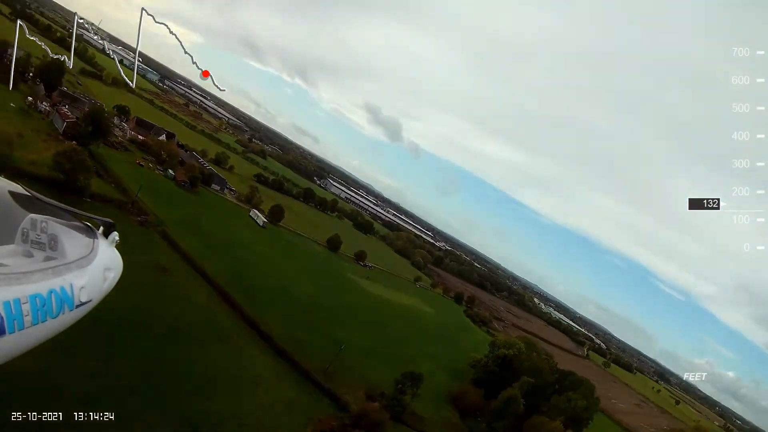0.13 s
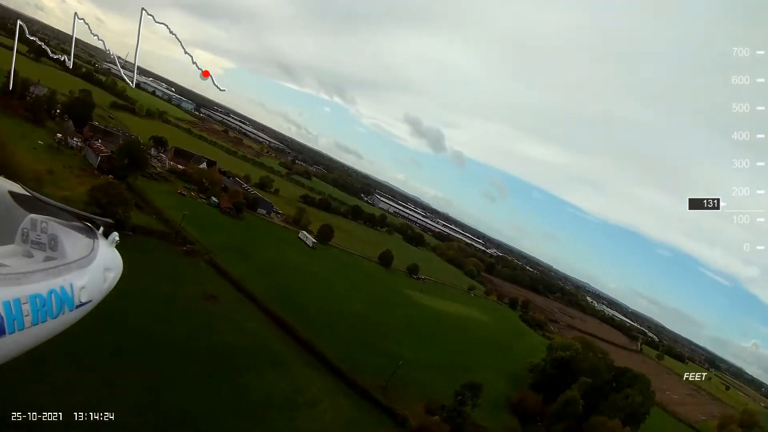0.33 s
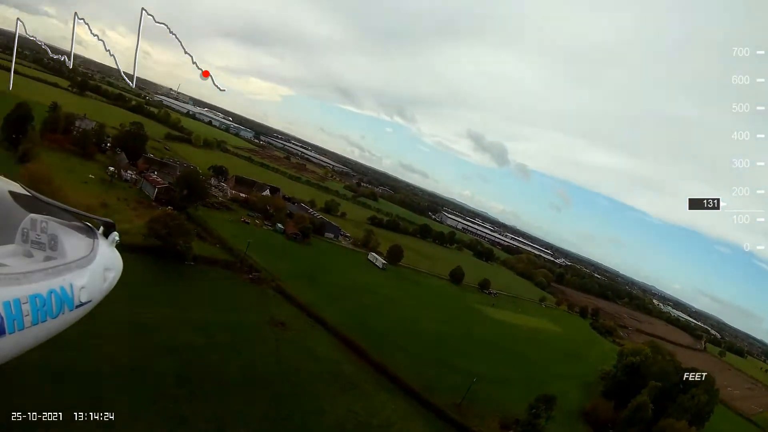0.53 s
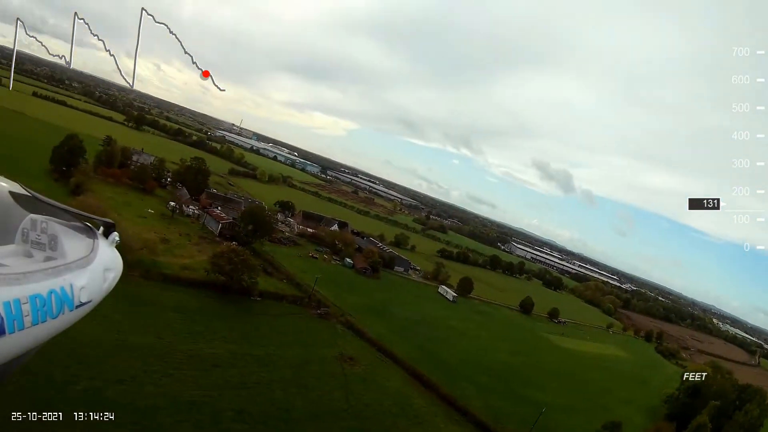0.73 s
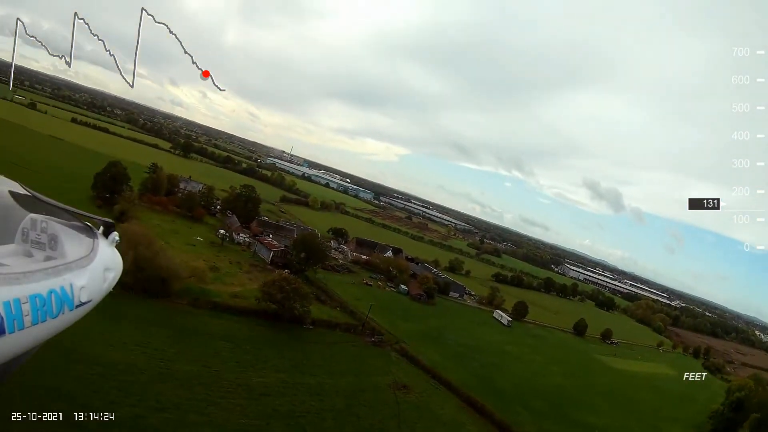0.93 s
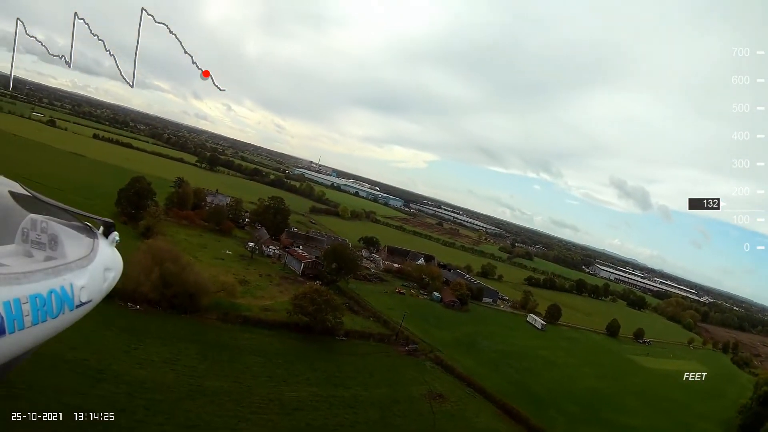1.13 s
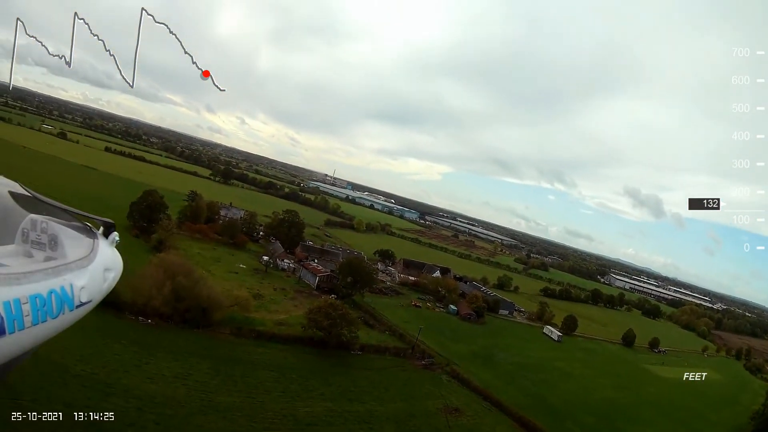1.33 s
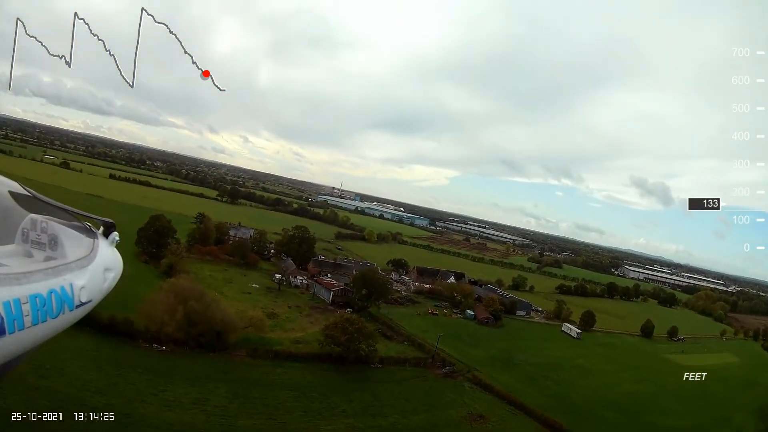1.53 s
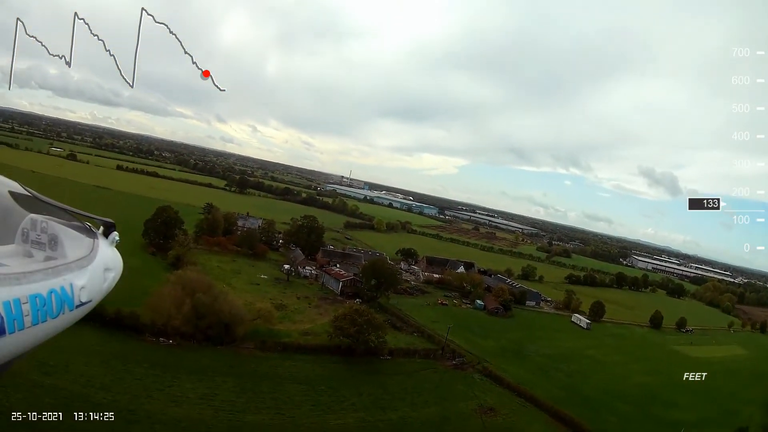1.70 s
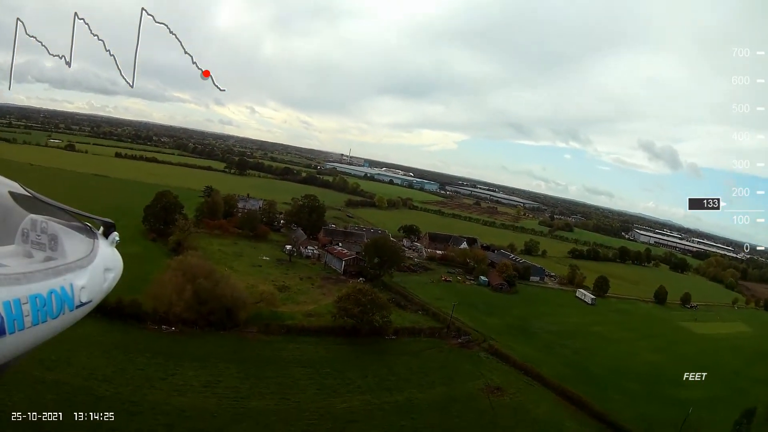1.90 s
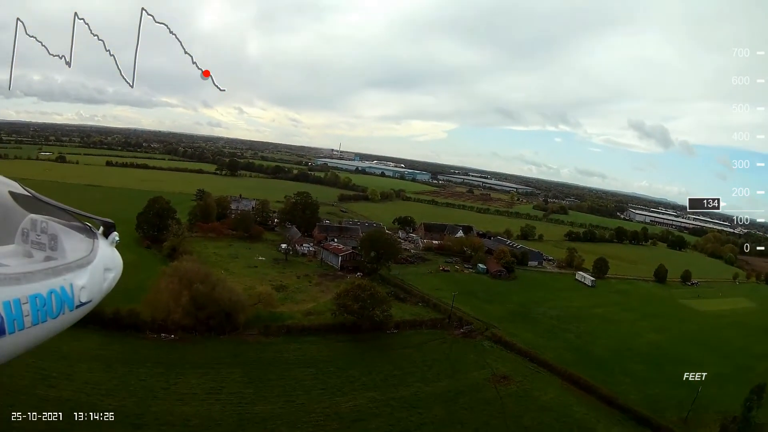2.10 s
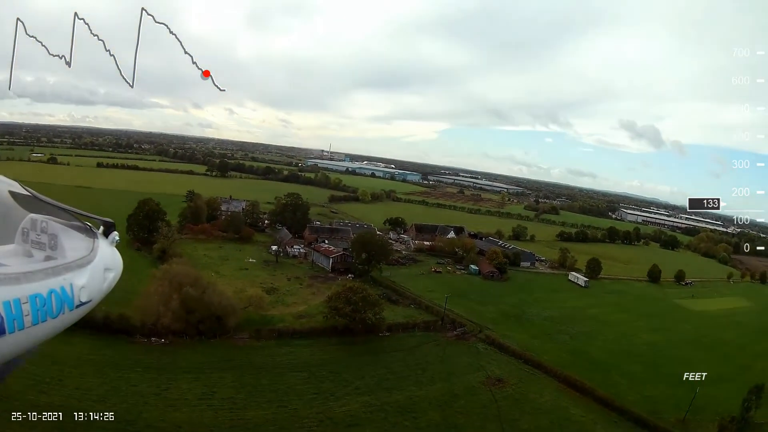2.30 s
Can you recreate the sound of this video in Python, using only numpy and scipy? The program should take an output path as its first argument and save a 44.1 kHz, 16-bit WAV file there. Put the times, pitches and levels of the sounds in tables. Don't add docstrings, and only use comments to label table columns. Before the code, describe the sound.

Wind roars across a small onboard microphone in gliding flight, breathy and centred near 2.5 to 3 kHz. It flutters with tiny whistles until 0.4 s, swells at 0.55-0.7, and sinks to a lull from 0.8 to 1.2. A sharp gust peaks at 1.4, then quiet until 1.85 exposes faint servo ticking, fifty per second. Strong uneven roaring fills the end, dry, limited, with slight watery compression artefacts.

```python
import sys
import numpy as np
from scipy import signal
from scipy.fft import rfft, irfft, next_fast_len
from scipy.io import wavfile
from scipy.ndimage import uniform_filter1d, minimum_filter1d

SR = 44100
rng = np.random.default_rng(int(sys.argv[2]) if len(sys.argv) > 2 else 0)


def bounce(signal):
    frames = np.transpose(np.atleast_2d(signal))
    limited = np.clip(frames, -1, 1)
    pcm = np.round(limited * 32767).astype(np.int16)
    wavfile.write(sys.argv[1], SR, pcm)


def nominal_scale(level):
    x = np.asarray(level, float) / 20
    return 10 ** x


N = 103811


def evened(x):
    return x / np.sqrt(np.mean(x ** 2) + 1e-20)


def read(points, hz):
    f, value = np.transpose(points)
    return np.interp(np.log(hz + 1), np.log(f + 1), value)


def bump(t, centre, length):
    return np.cos(np.pi / 2 * np.clip((t - centre) / length, -1, 1)) ** 2


def servo():
    # pitch_hz, level_db, t60_s
    shell_modes = [(2750, 0, .011), (3400, -2, .008), (2300, -5, .008), (1400, -8, .01), (5300, -27, .008),
                   (12000, -44, .005)]
    start_s, period_s, level_db, spread_db = .0122, .02, -29, 2.5
    at = np.round((start_s + period_s * np.arange(117)) * SR).astype(int)
    kicks = np.zeros(N)
    kicks[np.clip(at, 0, N - 1)] = nominal_scale(spread_db * rng.standard_normal(len(at)))
    kicks = signal.oaconvolve(kicks, np.hanning(70))[:N] * rng.standard_normal(N) * .3
    t = np.arange(900) / SR
    ring = sum(nominal_scale(db - 60 * t / t60) * np.sin(2 * np.pi * hz * t) for hz, db, t60 in shell_modes)
    ring = ring * (1 - np.exp(-t / .0005)) ** 2
    return nominal_scale(level_db) * signal.oaconvolve(kicks, ring)[:N]


def whistles():
    # centre_s, length_s, pitch_hz, level_db
    edge_tones = [(.006, 0.012, 4000, -39), (0.036, 0.015, 5100, -32), (0.044, 0.01, 3450, -19.5),
                  (.057, 0.011, 4650, -36.5), (.073, 0.011, 3050, -17.5), (0.076, 0.023, 5700, -31),
                  (.092, 0.013, 3050, -27), (0.115, 0.012, 2950, -21), (.164, .012, 3700, -29),
                  (.172, 0.021, 4750, -28), (0.217, 0.0068, 3150, -14.5), (.228, 0.013, 3150, -20),
                  (0.247, 0.016, 3400, -20.5), (0.336, 0.028, 4150, -23.5), (0.416, .04, 6250, -39),
                  (.49, 0.014, 3300, -24.5), (0.517, 0.033, 6000, -34), (0.139, 0.017, 652, -28.5),
                  (0.175, 0.011, 960, -24.5), (.268, 0.013, 4700, -33), (0.148, .014, 5200, -34),
                  (.366, 0.026, 2930, -31), (1.932, 0.018, 992, -23), (0.572, 0.033, 5700, -37),
                  (0.694, 0.016, 1700, -15.5), (1.385, 0.035, 2900, -19), (1.975, 0.034, 2850, -18),
                  (2.126, 0.072, 2600, -23), (2.284, 0.03, 1700, -21), (2.33, 0.034, 2234, -19.5)]
    width_hz = 190
    out = np.zeros(N + 4000)
    r = np.exp(-np.pi * width_hz / SR)
    a, b = rng.standard_normal((2, N + 4000))
    wobble = signal.lfilter([1], np.convolve([1, -r], [1, -r]), a + 1j * b)
    wobble = 0.78 + 0.63 * wobble / abs(wobble).mean()
    for s, length, hz, db in edge_tones:
        at = np.arange(max(round((s - length) * SR), 0), round((s + length) * SR))
        t = at / SR - s
        turns = hz * (t - 0.016 * t ** 2 / length)
        tone = (wobble[at] * np.exp(2j * np.pi * turns)).real
        out[at] += nominal_scale(db) * bump(t, 0, length) * tone
    return out[:N]


def wind(patchy_db=2.5, flicker_db=1.5, fizz_db=1.0, streak_db=2.0, swirl_db=2.0, crackle_db=1.0):
    # time_s, level_db, side_wind (0-1)
    gusts = [(0, -29, 0.89), (.08, -29, 0.61), (.22, -26.5, 0.99), (.3, -31.5, 0.9), (.42, -36.5, 0.89),
             (.55, -22, 0.64), (0.689, -20.5, 0.47), (.75, -30.5, 0.4), (.85, -37, 0.2), (1.17, -35, 0.25),
             (1.25, -22, 0.37), (1.402, -15.5, 0), (1.452, -37.5, 0.31), (1.849, -39, 0.12),
             (1.92, -22.5, 0), (2.07, -19, 0.48), (2.2, -17.5, 0.2), (2.36, -17.5, 0)]
    # centre_s, length_s, level_db
    eddies = [(0.028, 0.011, -9), (0.137, 0.014, 4.5), (0.18, 0.025, 0.5), (0.365, .05, 6),
              (0.487, 0.015, 2.5), (0.52, 0.014, -3), (0.53, 0.012, -2), (0.718, 0.0075, 3.5),
              (0.793, 0.016, 4.5), (0.954, 0.017, -1.5), (1.009, 0.037, 6.5), (1.063, 0.041, -1.5),
              (1.112, 0.014, 7), (1.127, 0.028, -2.5), (1.241, 0.026, 6.5), (1.282, 0.02, 2),
              (1.431, 0.014, 2), (1.654, 0.0067, 7.5), (1.734, 0.028, -1), (1.795, 0.014, 7.5),
              (1.832, 0.022, 6.5), (1.897, .015, -2.5), (1.927, 0.0079, 6.5), (1.967, 0.036, 5.5),
              (2.01, 0.048, -10.5), (2.068, 0.015, 0.5), (2.2, 0.046, -2.5), (2.266, 0.023, 3),
              (2.33, 0.056, 4.5)]
    # freq_hz, level_db (per Hz)
    calm = [(30, -7.5), (300, -5), (2000, -7), (2800, -7), (3600, -16.5), (4200, -36.5), (8000, -46.5),
            (15500, -52)]
    # freq_hz, level_db (per Hz)
    roar = [(30, -17), (300, -11), (1000, -8), (2700, 0), (3300, -3), (4300, -21.5), (7000, -28),
            (15500, -50)]
    # freq_hz, level_db (per Hz)
    sideways = [(30, -10.5), (200, -9), (740, -5), (1800, -13.5), (3140, -7.5), (5800, -13), (7000, -36.5),
                (15500, -58)]
    # time_s, pitch_hz
    roar_pitch = [(0, 2900), (.45, 2840), (.56, 2270), (.7, 2520), (1.2, 2780), (1.4, 2610), (1.9, 2600),
                  (1.98, 2730), (2.07, 2390), (2.24, 2830), (2.36, 2460)]
    calm_db, roar_db = -39, -22.5
    roar_hz, eddy_from_hz = 2700, 650
    fullness_db = 17

    frames, hz = N // 128 + 5, np.fft.rfftfreq(512, 1 / SR)
    t = np.arange(frames) * 128 / SR
    at, level_db, side = np.transpose(gusts)
    push = (np.interp(t, at, level_db) - calm_db) / (roar_db - calm_db)
    push = np.clip(push, -.2, 1.2)[:, None]
    side = np.clip(np.interp(t, at, side), 0, 1.3)[:, None]

    shift = np.interp(t, *np.transpose(roar_pitch))[:, None] / roar_hz - 1
    stretch = 1 + shift * np.clip((4500 - hz) / 2000, 0, 1)
    ahead = read(calm, hz) * (1 - push) + read(roar, hz / stretch) * push
    body_db = -fullness_db * np.minimum(shift, 0) * np.exp(-(np.log((hz + 1) / 1200) / .9) ** 2)
    shape = nominal_scale(ahead * (1 - side) + read(sideways, hz) * side + body_db)
    roar_band = (hz > 1200) & (hz < 3600)
    shape = shape / np.sqrt((shape[:, roar_band] ** 2).sum(1, keepdims=True))

    a, b, patches = rng.standard_normal((3, frames, len(hz)))
    patches = uniform_filter1d(uniform_filter1d(patches, size=6, axis=0), size=5, axis=1)
    patches = evened(patches)
    flicker, fizz = uniform_filter1d(rng.standard_normal((2, frames, 1)), size=4, axis=1) * 2
    streaks = evened(uniform_filter1d(rng.standard_normal((frames, len(hz))), size=10, axis=0))
    field_db = (patchy_db + swirl_db * side * (hz > 2500)) * patches
    field_db += flicker_db * flicker * (hz > 400)
    field_db += fizz_db * fizz * (hz > 6000)
    field_db += streak_db * streaks * np.clip(hz / 4000, .3, 1)
    eddy_db = sum(db * bump(t, s, length) for s, length, db in eddies)
    field_db += eddy_db[:, None] * 1.08 * hz / (hz + eddy_from_hz)

    spectrum = (a + 1j * b) * shape * nominal_scale(field_db)
    noise = signal.istft(spectrum.T, nperseg=512, noverlap=384)[1][:N]
    crackle = crackle_db * evened(uniform_filter1d(rng.standard_normal(N), size=130))
    t = np.arange(N) / SR
    loudness = np.sqrt((shape ** 2).sum(1).mean())
    return evened(noise) * loudness * nominal_scale(np.interp(t, at, level_db) + crackle)


def scene():
    return (servo() + whistles() + wind())[None]


def starve(x):
    # centre_s, length_s, floor_db (re strongest partial), local_db (re neighbours)
    starved = [(.343, .0, -60, 1), (.515, .0, -30, 2.5), (.772, .04, -29, -6), (.899, .001, -20, 3),
               (1.092, .0, -26, -1), (1.24, .001, -17, 3), (1.369, .0, -17, 4.5), (1.517, .004, -20, 3),
               (1.69, .001, -27, -3), (1.86, .001, -20, 3.5)]
    overlap_s = .015
    out = x.copy()
    for s, length, floor_db, local_db in starved:
        reach = length / 2 + overlap_s
        at = np.arange(round((s - reach) * SR), round((s + reach) * SR))
        fade = np.sin(np.pi / 2 * np.clip(1 - (abs(at / SR - s) - length / 2) / overlap_s, 0, 1))
        lines = rfft(x[at] * fade)
        local = np.sqrt(uniform_filter1d(abs(lines) ** 2, size=25))
        threshold = np.maximum(abs(lines).max() * nominal_scale(floor_db), local * nominal_scale(local_db))
        kept = lines * (abs(lines) > threshold)
        kept = kept * np.sqrt(np.linalg.norm(lines) / np.linalg.norm(kept)) + .03 * lines
        out[at] = x[at] * (1 - fade ** 2) + fade * irfft(kept, len(at))
    return out


def top_cut(x):
    return signal.sosfilt(signal.butter(12, 15860, fs=SR, output="sos"), x)


def record(dry):
    # freq_hz, width_hz, level_db
    notches = [(8660, 430, -10.5), (14600, 250, -4)]
    limit = 0.28
    peak = uniform_filter1d(-minimum_filter1d(-abs(dry[0]), size=61), size=61)
    x = dry[0] / (1 + (peak / limit) ** 4) ** 0.19
    size = next_fast_len(N)
    hz = np.fft.rfftfreq(size, 1 / SR)
    notch_db = sum(db * np.exp(-((hz - f) / width) ** 2) for f, width, db in notches)
    low_cut = 1 / np.sqrt(1 + (22 / (hz + 1)) ** 4)
    x = irfft(rfft(x, size) * nominal_scale(notch_db) * (hz < 15800) * low_cut, size)[:N]
    return top_cut(starve(x)[None])


dry = scene()
out = record(dry)
bounce(out)
```